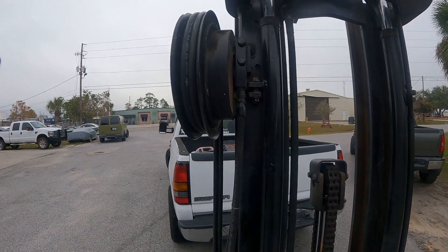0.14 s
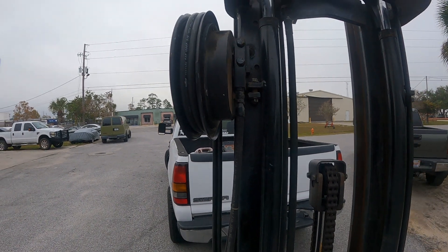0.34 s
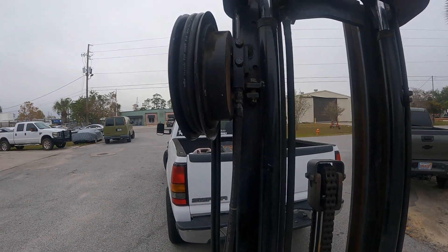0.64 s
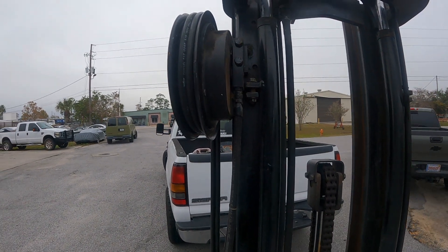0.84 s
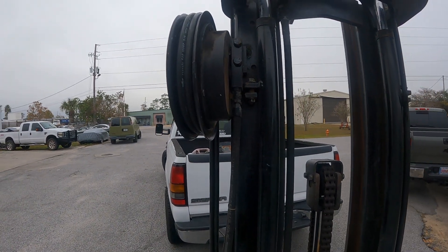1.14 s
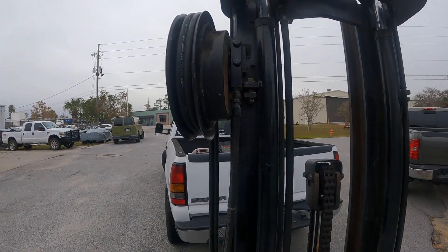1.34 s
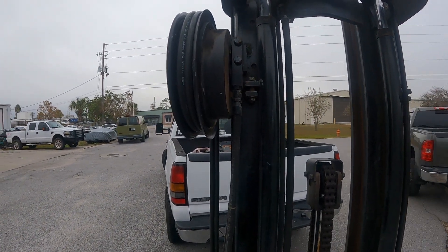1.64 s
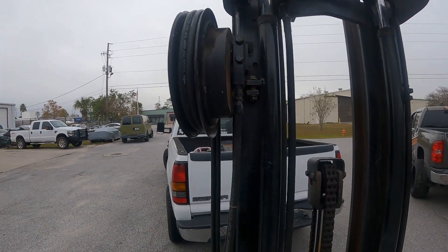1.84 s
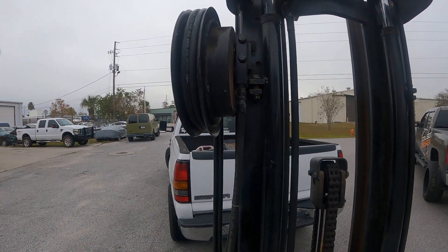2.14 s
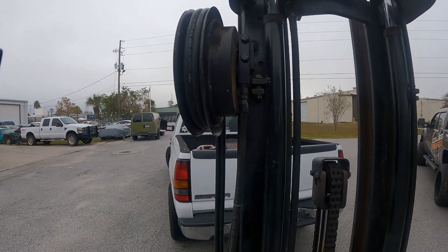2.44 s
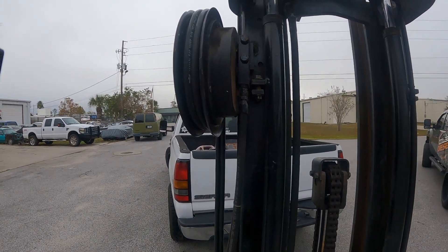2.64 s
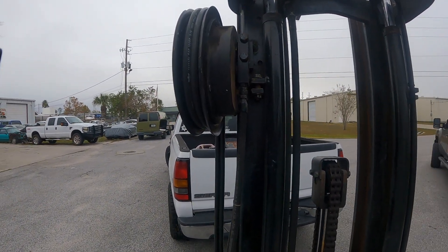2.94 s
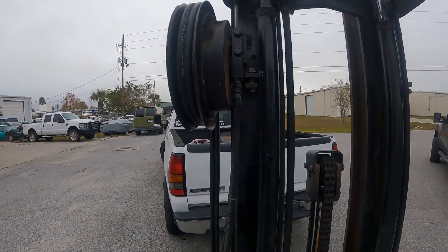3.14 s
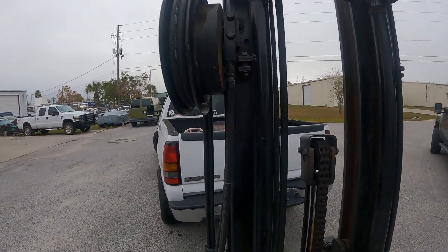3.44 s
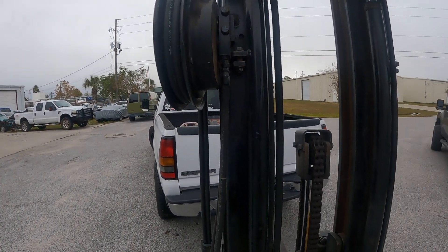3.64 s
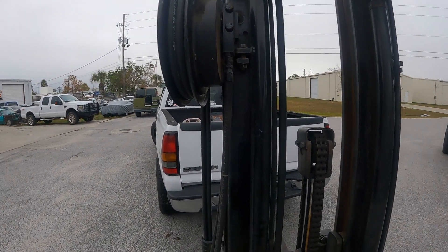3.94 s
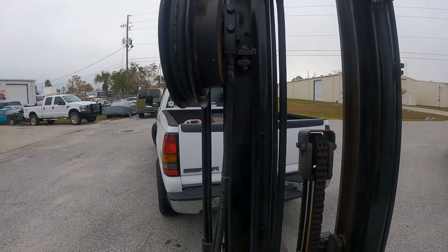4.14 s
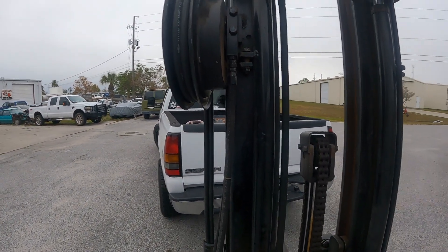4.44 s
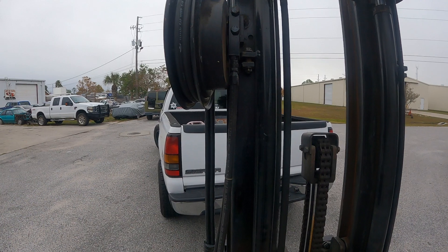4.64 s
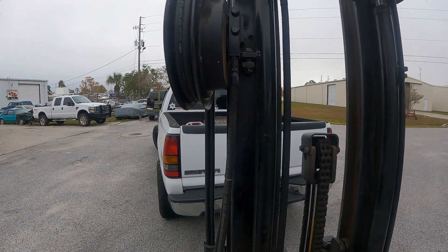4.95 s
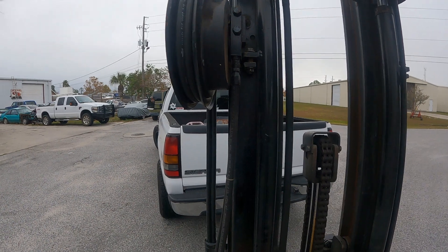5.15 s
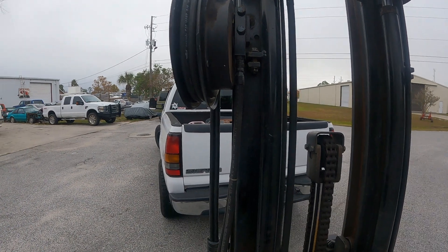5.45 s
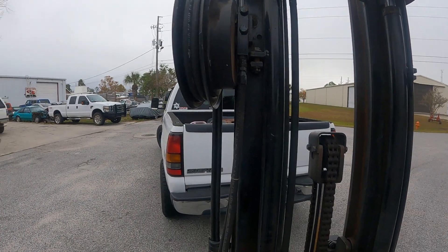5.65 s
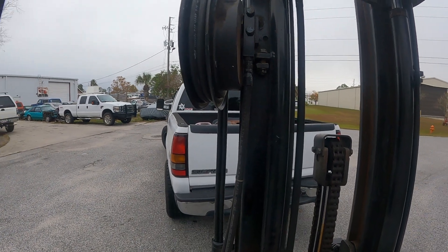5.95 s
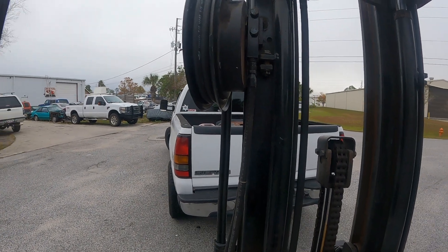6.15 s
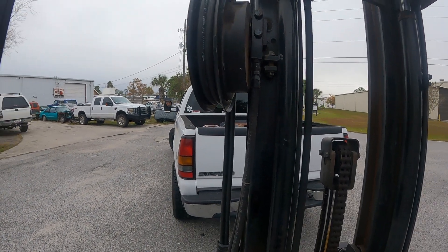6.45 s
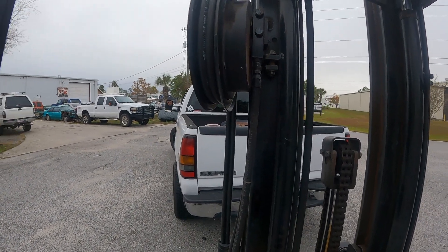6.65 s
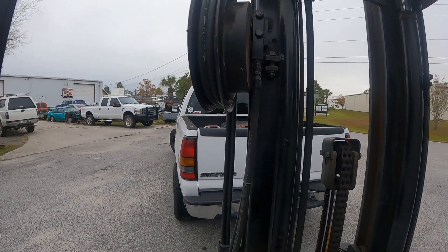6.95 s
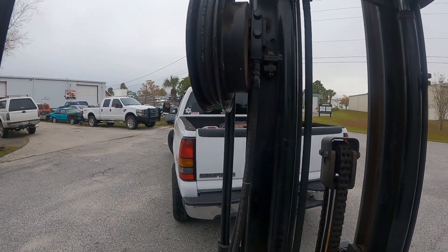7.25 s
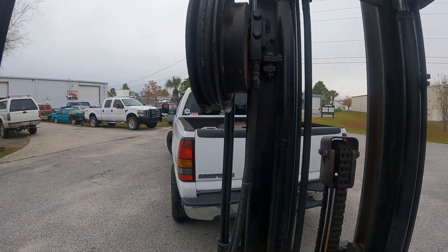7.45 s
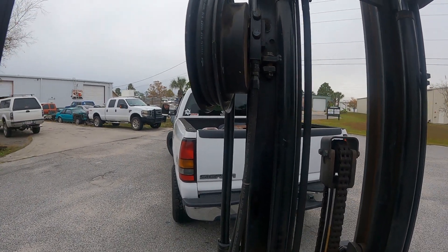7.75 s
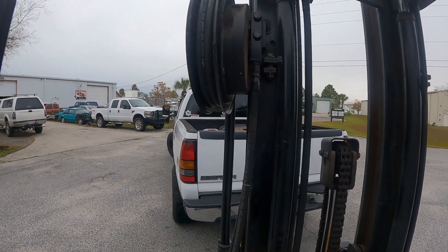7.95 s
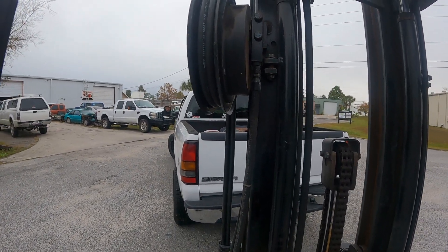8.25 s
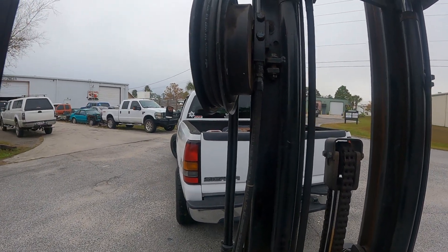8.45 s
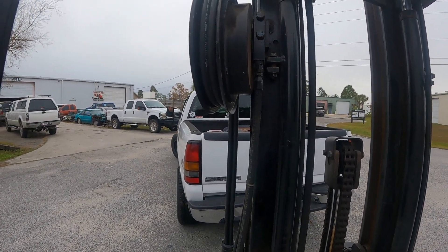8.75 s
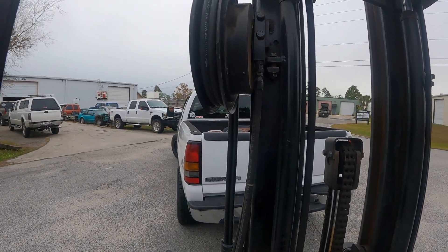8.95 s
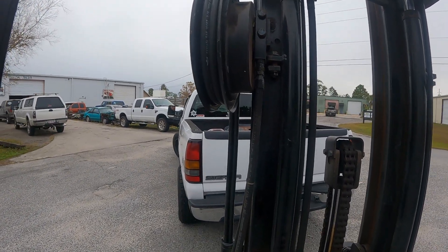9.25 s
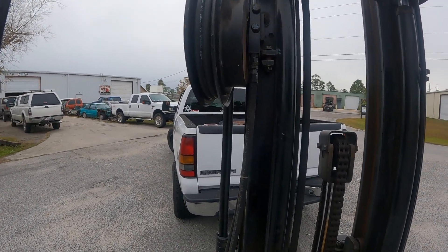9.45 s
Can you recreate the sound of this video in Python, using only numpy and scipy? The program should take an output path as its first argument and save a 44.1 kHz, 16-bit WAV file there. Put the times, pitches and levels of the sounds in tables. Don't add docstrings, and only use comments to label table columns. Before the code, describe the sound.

A forklift engine hums steadily in the open, chain rattling lightly; one metallic clank over a bump, then the engine sags, surges and hunts.

```python
import sys
import numpy as np
from scipy import signal
from scipy.fft import rfft, irfft
from scipy.io import wavfile
from scipy.ndimage import uniform_filter1d

SR = 44100
rng = np.random.default_rng(int(sys.argv[2]) if len(sys.argv) > 2 else 0)


def file_out(sig):
    cols = np.atleast_2d(sig).T
    lim = np.clip(cols, -1, 1)
    pcm = np.round(lim * 32767).astype(np.int16)
    wavfile.write(sys.argv[1], SR, pcm)


def rack_gain(trim_db):
    fader = np.asarray(trim_db, float)
    return 10 ** (fader / 20)


N = 423360
T = np.arange(N) / SR
HZ = np.fft.rfftfreq(N, 1 / SR)
IDLE_HZ = 51.5
MISFIRE_S, LIMP_S = 0.019, 0.031

# (time [s], firing rate [Hz], throttle [dB], load on the drive [dB],
# unevenness of the cylinders [dB])
ENGINE_RUN = [(0, 51.44, -.5, -1.5, 0), (4.42, 51.85, 0, -1.5, -10), (4.66, 47.4, -11.5, -14, 3),
              (4.76, 41.2, -5, 1, 3), (4.86, 49.85, -0.5, 2.5, 1), (5.04, 63.94, -2, 6.5, 1.5),
              (5.46, 57.34, -2, 8.5, 3.5), (5.66, 46.4, -1, 0, -4), (5.98, 40.4, 1, -2, -0.5),
              (6.46, 41.5, 2, 3, -3.5), (6.6, 54.54, 0, 7.5, 9), (6.72, 58, -0.5, 9, 6),
              (6.86, 56.53, -2, 5.5, 6), (7.1, 46.6, 0, 7, -2), (7.28, 42.94, 0.5, -8, 0),
              (7.55, 51.1, 0, -0.5, 3), (9.04, 50.4, -0.5, 1.5, 4), (9.2, 47.08, 0, 5.5, 1)]
# (time [s], change of firing rate [Hz], length [s])
GOVERNOR_HUNTS = [
    (7.742, 0.3, .2),
    (8.46, 3.5, 0.049),
    (8.7, -3, 0.065),
    (9.01, 1.2, 0.071),
    (9.543, 2, 0.077),
]
# (time [s], loss [dB])
WEAK_FIRINGS = [(.71, 6), (1.02, 1.5), (1.775, 6), (1.91, 4), (1.955, 3), (2.09, 0.5), (2.43, 7),
                (2.99, 4.5), (3.25, 3.5), (4.49, 3), (4.65, -8), (4.715, -2), (5.0, 6), (5.35, 8),
                (5.61, 12.5), (5.79, 6.5), (5.93, 12), (6.03, 5), (6.15, 5), (6.36, 4), (6.42, 3.5),
                (7.08, 8), (7.22, 14.5), (8.39, 8), (8.5, 9), (8.61, 14), (9.44, 4), (9.569, 15)]
# (idle level [dB], share of throttle [dB/dB], gain with speed over idle [dB/dB])
LAYERS = [
    (-18, 1.2, 1.5),
    (-38, 0.31, 8.5),
    (-30.5, 1.6, 2.7),
    (-30, 0.57, 0.1),
    (-25.5, 0.66, 1),
    (-44, 0.56, 1.4),
    (-9, -0.62, -2.5),
]
# (multiple of firing rate [ratio], level [dB])
LUG_ORDERS = [(1.5, 4), (2.5, -2)]
# (multiple of firing rate [ratio], level over the boom [dB])
CAB_ORDERS = [(3, -7), (3.5, -2), (4, -4), (4.5, -7)]
# (frequency [Hz], density [dB per Hz])
BOOM_SPECTRUM = [(5, -22), (20, -13), (45, -10), (75, -9), (120, -11), (150, -12.5), (206, -12), (263, -21),
                 (330, -17), (430, -52), (730, -120)]
# (frequency [Hz], density [dB per Hz])
ROAR_SPECTRUM = [(150, -19), (250, -4), (326, -10.5), (385, -5), (468, -10), (673, -1), (843, -7.5),
                 (1020, -4), (1130, -7), (1660, -9), (2600, -30), (3380, -60), (5720, -120)]
# (frequency [Hz], density [dB per Hz])
CLATTER_SPECTRUM = [(1180, -17.5), (2000, 2), (2250, -13.5), (2400, -7.5), (3060, -9), (3330, -7.5),
                    (3880, -15.5), (4220, -15.5), (4580, -8.5), (6100, -21.5), (7260, -23), (8230, -29),
                    (9460, -29.5), (10600, -42.5), (13800, -68), (22000, -120)]
# (frequency [Hz], density [dB per Hz])
HISS_SPECTRUM = [(6180, -29), (10500, -3), (10600, -7), (13800, -16), (15600, -24), (22000, -120)]
# (frequency [Hz], width [Hz], boost [dB])
BOOM_MODES = [(192, 17, -12), (204.6, 38, 6), (227.6, 10.3, 3.5)]
# (frequency [Hz], width [Hz], boost [dB])
ROAR_MODES = [(373.6, 92, 1.5), (621.4, 9.7, 5.8), (651, 15.4, 3), (686.6, 33, 3.7), (945, 31, 2.9),
              (1020.6, 17.7, 8.8), (1042, 22, 5.6), (1191, 53, 1), (1658, 140, 1.2), (1873, 63, 5.2)]
# (frequency [Hz], width [Hz], boost [dB])
CLATTER_MODES = [(3280, 54, -14), (4500, 110, -8), (9100, 150, -1), (9570, 400, -0.5)]
# (time [s], level [dB])
VALVE_LEAK = [(0, -2.5), (2.7, -1), (4.04, 2.5), (5, -4.5), (6.2, 2), (6.9, 0), (7.4, -4), (7.65, 5.5),
              (8.1, -3), (9.6, 1)]
# (frequency [Hz], # cylinder [number],
# level before the bump [dB], level after [dB])
VALVE_PINGS = [
    (9770, 0.33, -25, -16),
    (8700, 2, -23, -15),
    (14200, 0, -50, -44),
]
# (time [s], pin level [dB], carriage level [dB], thud level [dB])
CLANK_BLOWS = [(4.388, -25.5, -25, -41), (4.393, -26, -16.5, -28), (4.399, -37, -12, -30),
               (4.406, -36, -12, -27), (4.412, -34.5, -15, -27), (4.42, -42, -23, -30),
               (4.429, -34.5, -23.5, -27), (4.434, -40, -27, -28), (4.443, -45, -26, -29),
               (4.452, -45, -35, -39), (4.465, -50, -31, -37)]
# (frequency [Hz], width [Hz], level [dB])
PIN_MODES = [(4472, 250, -6), (7530, 220, 3), (8460, 230, -32), (9900, 180, -12.5), (13900, 250, -16)]
# (frequency [Hz], width [Hz], level [dB])
CARRIAGE_MODES = [(450, 250, -5), (843, 66, 11.5), (1000, 200, -4.5), (1360, 500, -1.5), (1758, 170, 1.5),
                  (2720, 300, -6), (3230, 300, -3), (3900, 260, -4.5), (4600, 300, -12), (7009, 2100, -25)]
# (frequency [Hz], width [Hz], level [dB])
THUD_MODES = [(105, 35, 10), (185, 40, 4)]
# (pin [Hz], carriage [Hz], chassis [Hz])
BLUNT_HZ = (11000, 5530, 2000)
# (time [s], length [s], level [dB])
PIN_SLIPS = [
    (4387e-3, 0.015, -24),
    (5.19, .01, -38),
]
# (frequency [Hz], level [dB])
SQUEAL_TONES = [(4550, -6), (7420, 0), (10300, -19)]
# (time [s], list of (frequency [Hz], level [dB], t60 [s]))
TYRE_BOUNCE = (4.411, [(101.4, -10, 0.22), (78.4, -23, 1), (179, -17.5, .15)])
# (time [s], peak level [dB], loudest ring [Hz], t60 [s])
MAST_RATTLES = [(0.0528, -28.5, 3540, 0.018), (1.734, -31, 3640, 0.09), (1.7769, -28, 4390, 0.036),
                (2.0114, -33, 4040, 0.054), (2.149, -28, 4500, .03), (2.4994, -34, 3557, 0.049),
                (4.376, -36, 4600, .05), (2.8599, -30.5, 3290, 0.067), (3.89, -25, 4600, 0.033),
                (4.0831, -29, 4750, 0.041), (4.1599, -27, 5230, 0.046), (4.275, -26, 4467, 0.049),
                (4.297, -27, 4780, 0.07), (4.4307, -26, 3800, 0.02), (4.455, -27, 3500, .06),
                (4.4634, -29, 4070, 0.048), (4.472, -28, 3900, 0.036), (4.487, -46, 3900, 0.032),
                (4.5337, -21.5, 5200, 0.036), (5.025, -35, 4700, 0.05), (5.1906, -31, 4900, 0.04),
                (5.215, -30, 3114, .04), (5.41, -35, 3470, .07), (5.258, -28, 3094, 0.04),
                (5.3148, -32.5, 3190, 0.082), (5.49, -33, 3280, 0.094), (7.4114, -41, 5000, 0.036),
                (7.417, -27.5, 7200, 0.034), (7.423, -27, 6640, 0.035), (7.427, -36, 4500, 0.04),
                (8.5889, -29, 3380, 0.048)]
# (frequency [Hz], density [dB per Hz])
RATTLE_SPECTRUM = [(1470, -36), (2500, -10), (2960, -6.5), (3590, 1.5), (5190, -8.5), (5650, -5.5),
                   (6930, -11.5), (8410, -17), (9550, -20), (10600, -21), (13800, -52), (22000, -120)]
# (frequency [Hz], width [Hz], boost [dB])
CHAIN_MODES = [(3540, 180, -11), (4040, 140, 3), (5100, 150, 13.5), (6800, 58, 0), (7530, 170, 5)]
# (time [s], peak level [dB])
CHAIN_TICKS = [(0.843, -45), (1.274, -49), (1.3508, -45), (1.3678, -45), (2.071, -36.5), (2.0912, -37.5),
               (2.1291, -40), (2.17, -33), (2.2084, -41), (2.2278, -40), (2.2468, -36), (2.2887, -39),
               (2.3098, -43), (2.524, -45), (2.544, -46), (2.6224, -43), (2.642, -42), (2.661, -43),
               (2.822, -46), (2.8429, -48), (2.8814, -41), (2.9003, -44), (2.92, -50), (0.5623, -46),
               (1.1258, -45), (3.3867, -45), (3.6621, -46), (3.0435, -45), (3.7778, -39), (4.0048, -39),
               (4.1784, -33), (4.8778, -45), (4.9658, -43), (6.4273, -49), (5.9334, -44), (6.6004, -49),
               (7.1177, -51), (7.3018, -46), (7.5492, -45), (9.4559, -44)]
# (start [s], length [s], peak level [dB])
TICK_SPELLS = [
    (.033, .05, -23.5),
    (4.911, 0.97, -47),
]
# (frequency [Hz], level [dB], t60 [s], rise [s])
GUIDE_RING = (6800, -2, .036, .003)
# (frequency [Hz], likeness [0-1], left over right [dB], left leads [rad])
PORTS = [(100, .99, 0, .03), (500, .98, 1.8, .02), (1030, .97, 4.3, -.08), (1450, .93, 4.3, -.65),
         (1900, .93, 2.2, -1.26), (2170, .8, -.9, -1.55), (2400, .5, -2.4, .07), (2800, .72, .3, -.2),
         (3300, .8, 4.3, -.9), (3800, .62, 2.2, -.7), (4550, .82, -2, -.09), (5600, .86, .6, -.05),
         (6400, .6, 0, 0), (10000, .65, 3.4, 0), (13000, .45, .6, 0)]


def evened(x):
    return x / np.sqrt(np.mean(x ** 2) + 1e-20)


def read(points):
    f, value = np.transpose(points)
    return np.interp(np.log(HZ + 1), np.log(f + 1), value)


def columns(rows):
    s, *rest = np.transpose(rows)
    return [np.interp(T, s, c) for c in rest]


def ringing(modes):
    return sum(rack_gain(db) / (1 + 2j * (HZ - hz) / width) for hz, width, db in modes)


def coloured(x, spectrum, modes):
    return irfft(rfft(x) * rack_gain(read(spectrum)) * (1 + ringing(modes)), N)


def wander(per_s):
    size = int(SR / per_s)
    return evened(uniform_filter1d(uniform_filter1d(rng.standard_normal(N), size), size))


def per_firing(turns, spread):
    return spread * np.clip(rng.standard_normal(2000), -2, 2)[turns.astype(int) + 1]


def engine():
    hz, throttle_db, pull_db, uneven_db = uniform_filter1d(columns(ENGINE_RUN), size=3000)
    hz = hz + sum(change * np.exp(-((T - s) / length) ** 2) for s, change, length in GOVERNOR_HUNTS)
    rev_db = 20 * np.log10(hz / IDLE_HZ)
    levels = [db + a * throttle_db + b * rev_db for db, a, b in LAYERS]
    boom_db = levels[3]
    loose = 1 / (1 + rack_gain(1.7 * pull_db))
    turns = np.cumsum(hz * (1 + 0.0077 * wander(30))) / SR
    hum = firing_orders(turns, levels[:3], uneven_db, loose)
    hum += lugging(turns, throttle_db, uneven_db, rev_db)
    hum += cab_orders(turns, hz, boom_db + pull_db, loose)
    hum += rack_gain(-50.0) * wander(25)
    return np.sqrt(2) * hum, engine_noise(turns, hz, levels[3:], throttle_db, loose)


def firing_orders(turns, levels, uneven_db, loose):
    first_db, half_db, second_db = levels
    weak, limp = misfires(MISFIRE_S), misfires(LIMP_S)
    first_db = first_db - weak + 0.15 * wander(27)
    second_db = second_db - 0.92 * limp + 1.1 * wander(21)
    half_db = half_db + uneven_db + 2.2 * np.minimum(limp, 4.5) - 6.5 + 2.2 * wander(9)
    slip = 1.8 * np.cumsum(weak) / SR
    hum = rack_gain(first_db) * np.cos(2 * np.pi * turns)
    hum += rack_gain(second_db) * np.cos(4 * np.pi * turns + .6 + slip)
    return hum + rack_gain(half_db) * np.cos(np.pi * turns + 1.9 * loose * wander(12))


def misfires(width):
    t = T[::50]
    return np.interp(T, t, sum(db * np.exp(-((t - s) / width) ** 2) for s, db in WEAK_FIRINGS))


def lugging(turns, throttle_db, uneven_db, rev_db):
    out = 0
    limp = misfires(LIMP_S)
    for order, db in LUG_ORDERS:
        lug_db = -46 + db + 0.8 * throttle_db - 4 * np.minimum(rev_db, 0)
        lug_db = lug_db + db / 2 * uneven_db / 2 * (db > 0)
        lug_db = lug_db + 1.25 * np.minimum(limp, 5 + db + db / 2)
        phase = order * turns + 0.12 * wander(8.6)
        out = out + rack_gain(lug_db + 2.5 * wander(8)) * np.cos(2 * np.pi * phase)
    return out


def cab_orders(turns, hz, level_db, loose):
    out = 0
    for order, db in CAB_ORDERS:
        near = .03 + 1 / (1 + ((order * hz - 208) / 20) ** 2)
        phase = order * turns + 0.09 * loose * wander(6.8)
        swell_db = level_db + db + 2.5 * loose * wander(10)
        out = out + rack_gain(swell_db) * near * np.cos(2 * np.pi * phase)
    return out


def engine_noise(turns, hz, levels, throttle_db, loose):
    boom_db, roar_db, clatter_db, chirp_db = levels
    late = turns + 0.74
    boom = evened(coloured(shaken(turns + 0.96, 11.0, 4.2), BOOM_SPECTRUM, BOOM_MODES))
    roar = evened(coloured(shaken(late, 4.6, 5.9), ROAR_SPECTRUM, ROAR_MODES))
    clatter = evened(coloured(shaken(late, 4.5, 3.5), CLATTER_SPECTRUM, CLATTER_MODES))
    clatter *= rack_gain(0.96 * wander(39))
    hiss = evened(coloured(shaken(late, 1.5, 4), HISS_SPECTRUM, [(14200, 300, -9)]))
    whistle = rack_gain(chirp_db + 1.4 * wander(12)) * valves(turns, hz)
    out = rack_gain(boom_db + 3.0 - 1.9 * (1 - loose)) * boom + rack_gain(roar_db) * roar
    out += rack_gain(clatter_db) * (rack_gain(4.0) * clatter + whistle)
    return out + rack_gain(-72.5 + .5 * throttle_db) * hiss


def shaken(turns, steady, uneven_db):
    swell = rack_gain(per_firing(turns, uneven_db)) * np.sin(np.pi * turns) ** 2
    return (steady + swell) * rng.standard_normal((2, N))


def valves(turns, hz):
    leak = chirps(turns + .6, 4400, 520 * (51 / hz) ** 1.2, 2.4, 1.7)
    out = rack_gain(columns(VALVE_LEAK)[0]) * leak
    loosened = np.clip(T - 5.4 + .5, 0, 1)
    for ping_hz, cylinder, before_db, after_db in VALVE_PINGS:
        beat = turns + 0.54 - cylinder / 20
        others = beat.astype(int) % 4 != round(cylinder)
        ping = chirps(beat, ping_hz, 60, 3.2, 2.7, fuzz_hz=60.8, pattern_db=-9.5 * loosened * others)
        out = out + rack_gain(before_db + (after_db - before_db) * loosened) * ping
    return out


def chirps(turns, end_hz, drop_hz, uneven_db, sharp, fuzz_hz=90, pattern_db=0):
    part = turns % 1
    fall = drop_hz * (1 + per_firing(turns, 0.23)) * np.exp(-(part / .4) ** 2)
    hz = end_hz + fall + fuzz_hz * wander(900)
    puff_db = pattern_db + per_firing(turns, uneven_db) + 2.1 * wander(570)
    puff = rack_gain(puff_db) * np.sin(np.pi * part ** 0.5) ** sharp
    return evened(puff * np.cos(2 * np.pi * np.cumsum(hz) / SR))


def clank():
    t, out = np.arange(900) / SR, 0
    hit = np.exp(-t / 0.0061) * (1 - np.exp(-t / 0.0003))
    for k, body in enumerate((PIN_MODES, CARRIAGE_MODES, THUD_MODES)):
        blows = np.zeros((2, N))
        for row in CLANK_BLOWS:
            start = round(row[0] * SR)
            blows[:, start:start + len(t)] += rack_gain(row[k + 1]) * hit * rng.standard_normal((2, len(t)))
        response = ringing(body) / (1 + (HZ / BLUNT_HZ[k]) ** 4)
        response = response / np.sqrt(np.mean(abs(response) ** 2))
        out = out + 0.91 * irfft(rfft(blows) * response, N)
    return out + chassis_bounce() + pin_squeal()


def chassis_bounce():
    s, modes = TYRE_BOUNCE
    since = np.maximum(T - s, 0)
    return sum(rack_gain(db - 60 * since / t60) * np.sin(2 * np.pi * hz * since) for hz, db, t60 in modes)


def pin_squeal():
    slip = sum(rack_gain(db) * np.sin(np.pi * np.clip((T - s) / length, 0, 1)) for s, length, db in PIN_SLIPS)
    return slip * sum(rack_gain(db) * np.sin(2 * np.pi * hz * T) for hz, db in SQUEAL_TONES)


def rattles():
    burst, ring = np.zeros(N), np.zeros(N)
    t = np.arange(4000) / SR
    guide_hz, guide_db, guide_t60, rise = GUIDE_RING
    guide = rack_gain(guide_db - 60 * t / guide_t60) * (1 - np.exp(-t / rise)) ** 2
    guide = guide * np.sin(2 * np.pi * guide_hz * t)
    ticks = [(s, min(db, -34) + 11, 4400, 0.034) for s, db in CHAIN_TICKS]
    for s, db, hz, t60 in MAST_RATTLES + ticks + spell_ticks():
        shape = rack_gain(db - 60 * t / max(t60, .01)) * (1 - np.exp(-t / 0.0019))
        span = slice(round(s * SR), round(s * SR) + len(t))
        burst[span] += shape
        ring[span] += shape * np.sin(2 * np.pi * hz * t) + rack_gain(db) * guide
    noise = evened(coloured(rng.standard_normal((2, N)), RATTLE_SPECTRUM, CHAIN_MODES))
    return rack_gain(-4) * burst * noise + rack_gain(-11) * ring


def spell_ticks():
    rows, spread_db, t60 = [], 7, 0.035
    for start, length, db in TICK_SPELLS:
        chance = rng.random((50, 2))
        for k, (size, pitch) in enumerate(chance[:int(length * IDLE_HZ) + 1]):
            slack_db = 3 * (k % 4 == 2)
            tick_db = db + spread_db * (2 * size - 1) - slack_db
            rows.append((start + k / IDLE_HZ, tick_db, np.interp(pitch, (0, 1), (4260, 5300)), t60))
    return rows


def breeze():
    return rack_gain(-43.5) * np.array([wander(110) - wander(30), wander(120) - wander(30)])


def scene():
    hum, noises = engine()
    a, b = rfft(noises + clank() + rattles())
    same, lean_db, lead = (read(np.array(PORTS)[:, [0, k]]) for k in (1, 2, 3))
    tilt = rack_gain(lean_db / 2) * np.exp(.5j * lead)
    left = a * tilt
    right = (same * a + np.sqrt(1 - same ** 2) * b) / tilt
    mid = abs(tilt + same / tilt) / 2 + 0.046
    low_orders = hum * rack_gain(np.array([[-.05], [.05]]))
    return breeze() + low_orders + irfft(np.array([left, right]) / mid, N)


def roll_off(x):
    return signal.sosfilt(signal.butter(12, 15750, fs=SR, output="sos"), x)


def record(dry):
    return roll_off(dry)


dry = scene()
out = record(dry)
file_out(out)
```